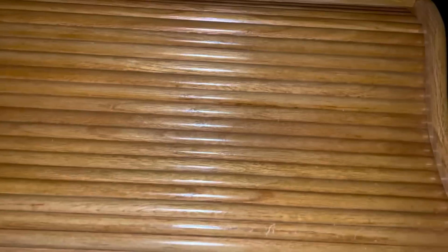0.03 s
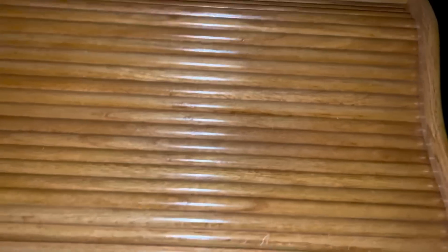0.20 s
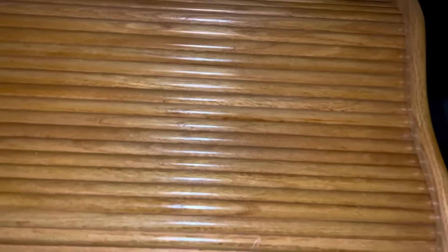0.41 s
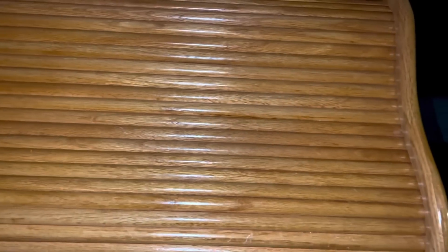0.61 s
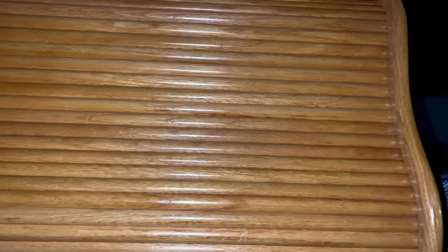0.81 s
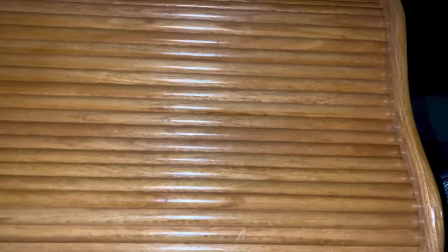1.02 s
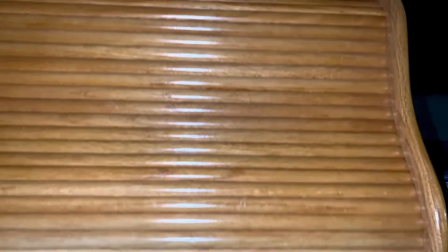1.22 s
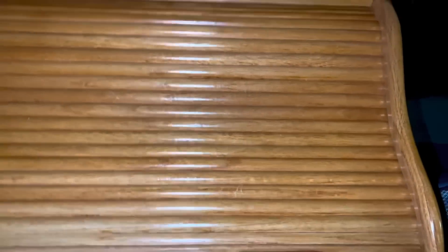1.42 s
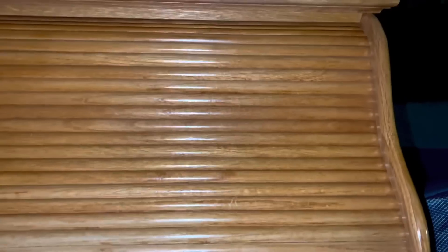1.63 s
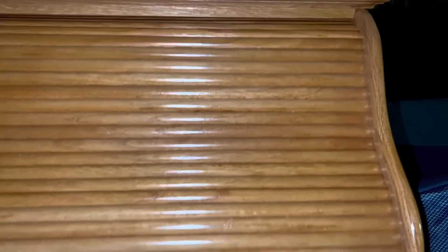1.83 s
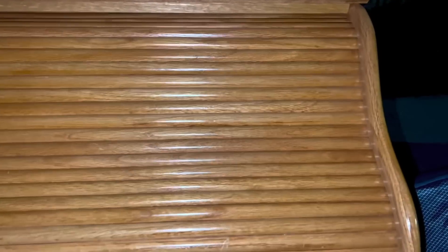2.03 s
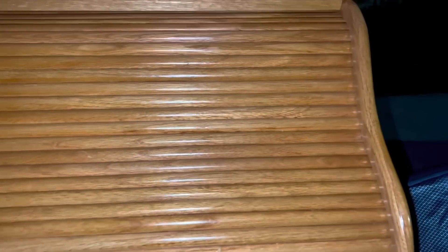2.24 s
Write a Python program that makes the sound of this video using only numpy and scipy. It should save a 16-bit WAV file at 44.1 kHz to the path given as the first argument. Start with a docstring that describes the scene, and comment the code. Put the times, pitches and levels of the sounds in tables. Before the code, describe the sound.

Close stereo sound of wooden slats rubbing in grooves, hollow low bumps and thin hiss in three strokes; a crisp wooden knock closes the first, small ticks dot the rest, with a short, dry indoor room response.

```python
"""In a quiet room, the slatted wooden roll top of a desk is pushed along its tracks in three strokes.
Rubbing is grainy noise: a low rumble, a scrape and a thin hiss. Jolts are short swelling low tones
with a noisy rattle. Short ticks, and one faint high chirp just after the start, are clusters of
short tones over a snap of noise. One sharp knock of dying wood and click tones, with clatter, ends
the first stroke. A short room answer follows ticks and knock, and soft room tone lies behind it all."""
import sys
import numpy as np
from scipy import signal
from scipy.fft import rfft, irfft, next_fast_len
from scipy.io import wavfile
from scipy.ndimage import uniform_filter1d, map_coordinates

SR = 44100
rng = np.random.default_rng(int(sys.argv[2]) if len(sys.argv) > 2 else 0)


def materialize(psi):
    """Save the field psi as 16-bit PCM at rate SR to the path in sys.argv[1].

    A 1-D psi becomes a single channel; in a 2-D psi each row is a channel.
    """
    bounded = np.clip(np.atleast_2d(psi).T, -1, 1)
    quanta = np.round(bounded * 32767).astype(np.int16)
    wavfile.write(sys.argv[1], SR, quanta)


N = 99225  # samples, 2.25 s

# Levels of the rubbing over time, joined by straight lines between points: time_s, scrape_level_db,
# hiss_level_db
RUB_LEVELS = [(0, -50.5, -56), (.1, -50, -58), (0.138, -47, -55.5), (.23, -43, -49.5), (0.3, -38, -47),
              (0.331, -61, -54.5), (0.451, -64.5, -68.5), (0.899, -58.5, -67.5), (1.0, -51, -54.5),
              (1.05, -40.5, -49.5), (1.18, -38, -49), (1.28, -43, -52), (1.37, -50.5, -55), (1.44, -57, -66.5),
              (1.521, -65.5, -72), (1.619, -68.5, -69.5), (1.699, -54, -58), (1.76, -47.5, -53),
              (1.809, -43.5, -55.5), (1.823, -40, -54), (1.901, -42.5, -49), (1.98, -50.5, -58.5),
              (2.039, -57, -64), (2.25, -56.5, -63)]
# Slats jolting the hollow carcass: start_s, level_db, pitch_hz, length_s
THUDS = [(.008, -30.5, 116, 0.06), (0.117, -31.5, 132, 0.033), (.152, -33, 135, 0.018),
         (.195, -30, 140.5, 0.042), (.217, -29.5, 140, 0.043), (.25, -30.5, 130, 0.048),
         (.298, -20, 149.6, 0.021), (0.32, -23.5, 68, 0.053), (0.317, -22, 144, 0.035),
         (0.342, -22, 104, 0.048), (0.376, -31, 98.5, 0.067), (0.951, -37, 108, 0.033),
         (1.026, -31.5, 139.6, 0.051), (1.082, -24, 132, 0.025), (1.123, -20, 116.4, 0.043),
         (1.153, -18, 106, 0.06), (1.204, -16.5, 107.8, 0.054), (1.251, -18.5, 119.7, 0.048),
         (1.288, -28, 120, 0.018), (1.308, -23, 134, 0.019), (1.33, -24, 139.7, 0.086),
         (1.364, -33, 124, 0.032), (1.396, -32, 140, 0.07), (1.457, -30.5, 135, 0.029),
         (1.723, -35.5, 161, 0.07), (1.77, -25.5, 118.4, 0.038), (1.816, -24, 148, 0.04),
         (1.857, -29.5, 181, 0.041), (1.89, -26, 113, 0.026), (1.923, -29.5, 140, 0.044),
         (1.962, -30, 152.3, 0.044), (2.009, -30.5, 111, 0.036)]
# Short ticks, and one faint high chirp just after the start: start_s, relative_level_db, pitch_hz
TICKS = [(0.035, -36.5, 12160), (0.045, -30.5, 4830), (0.05, -36.5, 1630), (1.18, -38, 4550),
         (1.03, -34, 1066), (1.059, -32.5, 1530), (1.147, -39, 4400), (1.201, -35, 4670),
         (1.293, -37.5, 4750), (1.563, -56.5, 4370), (1.812, -34.5, 946), (1.82, -32.5, 1420),
         (1.959, -45, 4400), (1.977, -43, 4610)]
# Contacts within the knock: start_s, relative_wood_level_db, relative_click_level_db
KNOCK_CONTACTS = [(0.3038, -29.5, -29.5), (0.3075, -23, -4), (0.3105, -28, 2), (0.3348, -41, -34)]
# Ringing tones of the knocked wood: pitch_hz, relative_level_db, time_to_fall_60_db_s
WOOD_TONES = [(286.4, -4, 0.055), (460, -11, 0.032), (834, -9.5, 0.067), (1055, -10.5, 0.03),
              (1390, -8.5, .025), (2211, 2, 0.027), (2530, -3.5, 0.09), (2800, -6.5, 0.058),
              (3560, -9, 0.017), (5130, -10.5, .04)]
# Bright tones of each click: pitch_hz, relative_level_db, time_to_fall_60_db_s
CLICK_TONES = [(6155, 5.5, 0.002), (7400, -8, 0.0023), (12260, -15.5, 0.0024), (13600, -19, 0.0017)]
# Tone colour of loose slats after a contact: frequency_hz, relative_level_db
CLATTER_COLOUR = [(250, 8), (1000, -4), (2500, -5), (6000, -9), (9000, -24), (11000, -67.5)]
# Resonances of the hollow carcass: pitch_hz, width_hz, relative_level_db
CARCASS_MODES = [(62, 52, -5.5), (113, 30, -1.5), (139, 34.6, -4.5), (176.5, 54, -5.5)]
# Resonances of the slats shaken by a jolt: pitch_hz, width_hz, relative_level_db
SLAT_MODES = [(59, 36.4, -2), (177, 41.3, 2.5), (248.3, 51, -1.5), (437, 61, -9.5), (748, 36, -11),
              (1140, 380, -24.5)]
# Tone colour of the scrape: frequency_hz, relative_level_db (per Hz)
SCRAPE_COLOUR = [(200, -8.5), (330, -3), (450, -8.5), (690, -12.5), (1100, -15.5), (1600, -21),
                 (3200, -27.5)]
# Tone colour of the hiss: frequency_hz, relative_level_db (per Hz)
HISS_COLOUR = [(1950, -9.5), (2250, 2.5), (2550, -3.5), (4200, -5), (5300, -4.5), (6200, -4), (7500, -9),
               (11300, -12.5), (15000, -15), (15800, -28.5)]
# Tone colour of the room tone: frequency_hz, relative_level_db (per Hz)
AIR_COLOUR = [(25, -27.5), (45, -1.5), (90, 0), (190, -16), (330, -17.5), (680, -29), (2000, -29),
              (4000, -49.5), (6500, -36.5), (9000, -50), (14500, -40.5), (15800, -51.5)]
# Left-right likeness of the rubbing and rattle: frequency_hz, likeness (1 same, 0 unrelated)
DESK_ALIKE = [(60, 0.92), (240, 1), (950, 0.52), (3770, 0.35), (15000, 0.35)]
# Left-right likeness of the room tone: frequency_hz, likeness (-1 opposite, 0 unrelated, 1 same)
AIR_ALIKE = [(100, 1), (550, -0.4), (2400, -0.86), (5000, -0.33), (15000, -0.8)]
# How long the room answers: frequency_hz, time_to_fall_60_db_s
ROOM_DECAY = [(150, 0.16), (1000, 0.06), (5000, .1), (12000, 0.014)]
# Phase by which left leads right in ticks and knock: frequency_hz, lead_radians
HIT_LEAD = [(100, -0.15), (1000, 1.13), (2150, 1.5), (3960, 1.05), (5770, 1), (8000, -0.62), (12000, 1.4)]

RUMBLE_DB = 7.5  # over the scrape
LINGER_S = 0.084  # time constant: the carcass keeps humming after a stroke
GRAINS_PER_S, GRAIN_SHARE = 500, 0.23  # grains in each strand; their share of the mix, 0 to 1
GRAIN_DB, PATCHY_DB = 2, 1.5  # scatter of grain sizes; depth of the drifting streaks
THUD_EARLY = 0.52  # under 1: the swell peaks before half its length
THUD_SOFT = 1.04  # over 1: the swell fades in and out more gently
WANDER_RAD = 0.3  # how far the phase of a thud wanders
RATTLE_DB = -14.5  # relative to the swell of the thud
TICK_SPREAD = 0.28  # scatter of tone pitches at 1500 Hz, as a natural logarithm
TICK_T60_S = 0.017  # time to fall 60 dB: the snap, and tones of a 4500 Hz tick
TICK_SNAP_DB = -5  # broad snap, relative to the level in the table
CLATTER_DB, CLATTER_T60_S = 1.5, 0.071  # over the wood level; time to fall 60 dB
ROOM_DB, ROOM_HZ = -14, 5000  # level of the room's answer; it is dull above this
AIR_DB = -49  # room tone before its bass is made lumpy
AIR_BASS_HZ, AIR_LUMPS_DB = 200, 2.5  # below this the level comes in lumps
LEAN_DB = 0.8  # rubbing and thuds, left over right
LOW_HZ, LOW_ORDER = 24, 4  # the microphone fades below this; steepness
GAP_HZ, GAP_WIDTH_HZ, GAP_DB = 10020, 880, -27  # a deep, steady, narrow gap in the whole sound
TOP_HZ = 15800  # nothing passes from here up


def slide():
    """Rubbing in the tracks drives the carcass, the slats and a thin hiss."""
    start_s, *levels = np.transpose(RUB_LEVELS)
    time_s = np.arange(N) / SR
    scrape_db, hiss_db = (np.interp(time_s, start_s, level) for level in levels)
    rumble = unit(filtered(rng.standard_normal((2, N)), resonances(CARCASS_MODES)))
    # The added end points fade the colour out beyond the table.
    scrape_colour = [(20, -88.5)] + SCRAPE_COLOUR + [(4000, -100.5)]
    hiss_colour = [(900, -57.5)] + HISS_COLOUR
    scrape = unit(filtered(friction(), lambda f: amp(along(scrape_colour, f))))
    hiss = unit(filtered(friction(), lambda f: amp(along(hiss_colour, f))))
    # The rumble follows the scrape sluggishly.
    hum = filtered(amp(scrape_db), lambda f: 1 / (1 + 2j * np.pi * f * LINGER_S))
    judder = wobble(30.2)
    rumble = rumble * amp(RUMBLE_DB) * hum
    scrape = scrape * amp(scrape_db + 1.2 * judder)
    hiss = hiss * amp(hiss_db + 0.48 * judder + 0.23 * wobble(80))
    return stereo(rumble + scrape + hiss, DESK_ALIKE)


def friction():
    """Dense noise with sharp grains and drifting streaks, in two unrelated strands."""
    happens = rng.random((2, N)) < GRAINS_PER_S / SR
    size = amp(GRAIN_DB * rng.exponential(size=(2, N)))
    grains = unit(happens * size * rng.standard_normal((2, N)))
    noise = rng.standard_normal((2, N))
    mix = GRAIN_SHARE * grains + (1 - GRAIN_SHARE) * noise
    z = signal.stft(mix, nperseg=256)[2]
    # Smooth random levels across pitch, then along time, to make streaks.
    streaks = uniform_filter1d(rng.standard_normal(z.shape[1:]), size=3, axis=0)
    streaks = unit(uniform_filter1d(streaks, size=10, axis=1))
    return signal.istft(z * amp(PATCHY_DB * streaks), nperseg=256)[1][:, :N]


def thuds():
    """Each jolt is a short, unsteady swell of a panel mode that rattles the slats."""
    out, shake = np.zeros(N + SR), np.zeros(N + SR)
    drift = np.pad(WANDER_RAD * wobble(60), (0, SR))
    for start_s, db, hz, length_s in THUDS:
        t = np.arange(int(length_s * SR)) / SR
        at = round(start_s * SR)
        swell = amp(db) * np.sin(np.pi * (t / length_s) ** THUD_EARLY) ** THUD_SOFT
        out[at:][:len(t)] += swell * np.sin(2 * np.pi * hz * t + drift[at:][:len(t)])
        shake[at:][:len(t)] += swell
    rattle = unit(filtered(friction(), resonances(SLAT_MODES)))
    return out[:N] + stereo(amp(RATTLE_DB) * shake[:N] * rattle, DESK_ALIKE)


def knock():
    """Every contact rings the wood anew, clicks brightly and shakes the loose slats."""
    out, shake = np.zeros(N + SR), np.zeros(N + SR)
    t = np.arange(SR // 4) / SR
    clatter = unit(filtered(rng.standard_normal(N), lambda f: amp(along(CLATTER_COLOUR, f))))
    for start_s, wood_db, click_db in KNOCK_CONTACTS:
        for hz, db, t60 in WOOD_TONES:
            level_db = wood_db + db + rng.normal(0, 3.4)
            add(out, start_s, level_db, hz, t60, .0003, phase=rng.uniform(0, 2 * np.pi))
        for hz, db, t60 in CLICK_TONES:
            add(out, start_s, click_db + db + 5.5, hz, t60, .0006)
        fade = amp(wood_db + CLATTER_DB - 60 * t / CLATTER_T60_S)
        shake[round(start_s * SR):][:len(t)] += fade
    return out[:N] + shake[:N] * clatter


def ticks():
    """Each tick, and the early chirp, is a cluster of short tones over a broad snap of noise."""
    out = np.zeros(N + SR)
    t = np.arange(SR // 50) / SR
    spreads = rng.standard_normal((len(TICKS), 8))
    snaps = rng.standard_normal((len(TICKS), len(t)))
    for (start_s, db, hz), spread, snap in zip(TICKS, spreads, snaps):
        t60 = TICK_T60_S * (4500 / hz) ** 0.16  # higher ticks die sooner
        for u in spread:
            tone_hz = hz * np.exp(TICK_SPREAD * u * (1500 / hz) ** .5)
            add(out, start_s, db - 7.0, min(tone_hz, SR / 2), t60, .0008, phase=50 * u)
        # Averaging over a third of a cycle dulls the snap of a low tick.
        snap = unit(uniform_filter1d(snap, size=int(SR / hz / 3) + 1))
        fade = amp(db + TICK_SNAP_DB - 60 * t / TICK_T60_S)
        out[round(start_s * SR):][:len(t)] += fade * snap
    return out[:N]


def room(x):
    """Each frequency of the room's answer dies at its own speed."""
    hz, t, z = signal.stft(rng.standard_normal((2, SR // 2)), SR, nperseg=256)
    fade = amp(-60 * t / along(ROOM_DECAY, hz)[:, None])
    tail = signal.istft(z * fade, SR, nperseg=256)[1]
    tail = tail / np.linalg.norm(tail[0])
    late = np.pad(x, (130, 0))[None]  # the answer starts about 3 ms late
    return signal.fftconvolve(late, tail, axes=1)[:, :N]


def air():
    """Room tone is shaped noise, steady above and lumpy in the bass."""
    noise = filtered(rng.standard_normal((2, N)), lambda f: amp(along(AIR_COLOUR, f)))
    tone = unit(stereo(noise, AIR_ALIKE))
    bass = filtered(tone, lambda f: f < AIR_BASS_HZ)
    lumpy_bass = bass * amp(AIR_LUMPS_DB * wobble(19))
    return amp(AIR_DB) * (tone - bass + lumpy_bass)


def amp(db):
    """Turn decibels into a gain."""
    return 10 ** (np.asarray(db) / 20)


def unit(x):
    """Scale to an rms (average strength) of 1."""
    return x / np.sqrt(np.mean(x ** 2) + 1e-20)


def along(points, hz):
    """Read a curve between (Hz, value) points on a log frequency axis."""
    f, v = np.transpose(points)
    return np.interp(np.log(hz + 1), np.log(f + 1), v)


def filtered(x, response):
    """Multiply the spectrum of x by a response, which may also shift phase."""
    m = next_fast_len(N + SR // 2)
    return irfft(rfft(x, m) * response(np.fft.rfftfreq(m, 1 / SR)), m)[..., :N]


def resonances(modes):
    """Sum resonant peaks of (Hz, width Hz, dB), each with the opposite sign to the last."""
    def response(f):
        total = 0
        for k, (centre, width, db) in enumerate(modes):
            peak = 1j * f * width / (centre * centre - f * f + 1j * f * width)
            total = total + (-1) ** k * amp(db) * peak
        return total
    return response


def wobble(rate):
    """Draw a smooth random curve through `rate` random points a second."""
    knots = rng.standard_normal(int(N * rate / SR) + 4)
    return map_coordinates(knots, [np.arange(N) * rate / SR])


def stereo(pair, alike):
    """Mix two unrelated signals to the given left-right likeness."""
    turn = lambda hz: np.arccos(np.clip(along(alike, hz), -1, 1)) / 2
    mid, side = filtered(pair, lambda hz: np.array([np.cos(turn(hz)), np.sin(turn(hz))]))
    return np.array([mid + side, mid - side])


def add(out, start_s, db, hz, t60, rise_s, phase=0):
    """Add one tone that rises quickly and dies by 60 dB in t60 seconds."""
    t = np.arange(int(t60 * SR) + 2) / SR
    swell = amp(db - 60 * t / t60) * (1 - np.exp(-t / rise_s))
    out[round(start_s * SR):][:len(t)] += swell * np.sin(2 * np.pi * hz * t + phase)


def scene():
    """Rubbing and thuds lean left; hits differ in phase left to right and the room answers them."""
    hits = ticks() + knock()
    side = np.array([[.5], [-.5]])  # left, right
    near = filtered(hits, lambda f: np.exp(1j * along(HIT_LEAD, f) * side))
    far = filtered(room(hits), lambda f: 1 / (1 + (f / ROOM_HZ) ** 4))
    desk = amp(LEAN_DB * side) * (slide() + thuds())
    return desk + near + amp(ROOM_DB) * far + air()


def record(dry):
    """The whole sound has little deep bass, a deep, steady, narrow treble gap and a steep upper limit."""
    def response(f):
        bass_fade = (1j * f / (LOW_HZ + 1j * f)) ** LOW_ORDER
        gap = amp(GAP_DB * np.exp(-((f - GAP_HZ) / GAP_WIDTH_HZ) ** 4))
        return bass_fade * gap * (f < TOP_HZ)
    return filtered(dry, response)


dry = scene()
out = record(dry)
materialize(out)
```